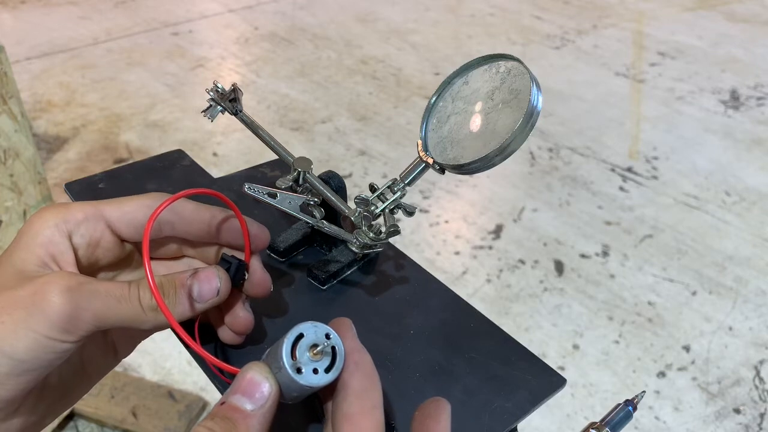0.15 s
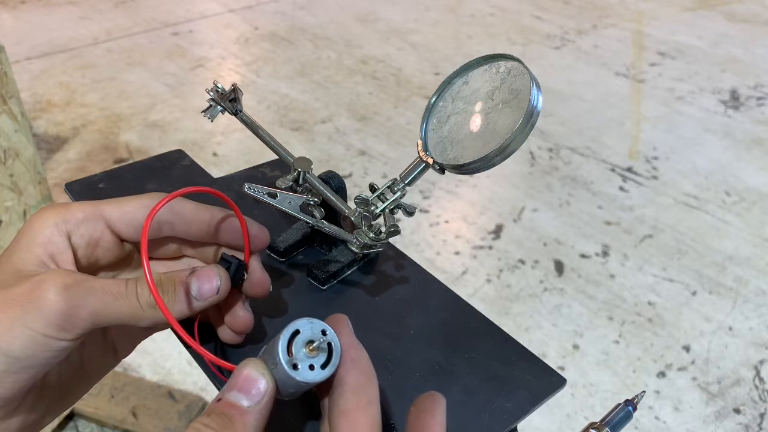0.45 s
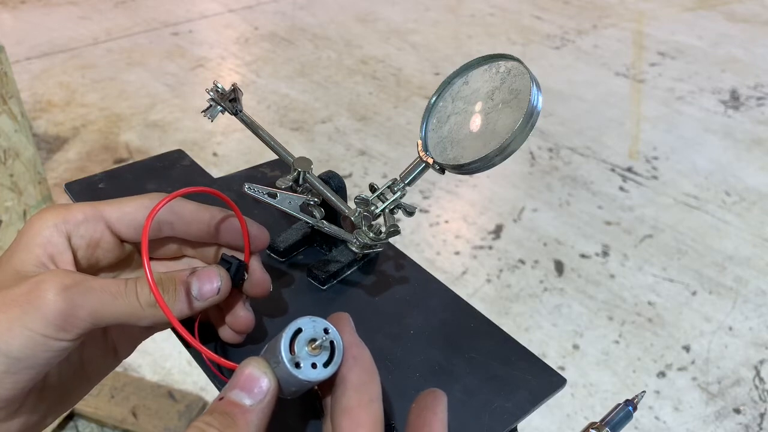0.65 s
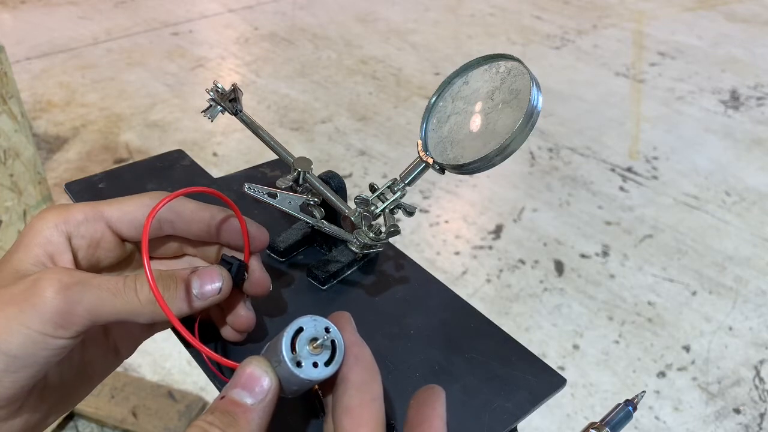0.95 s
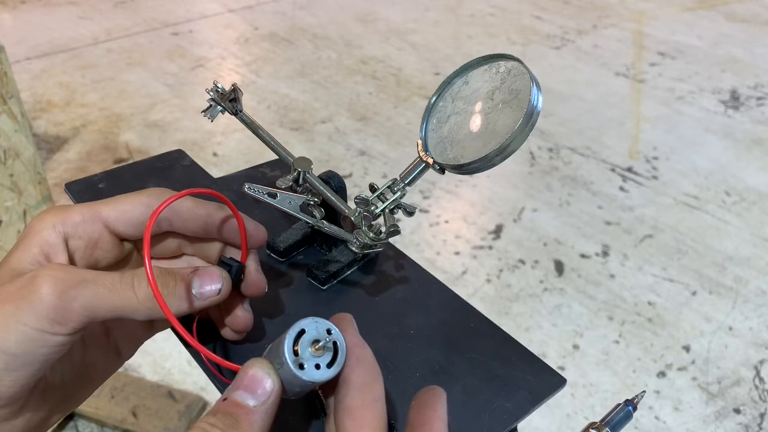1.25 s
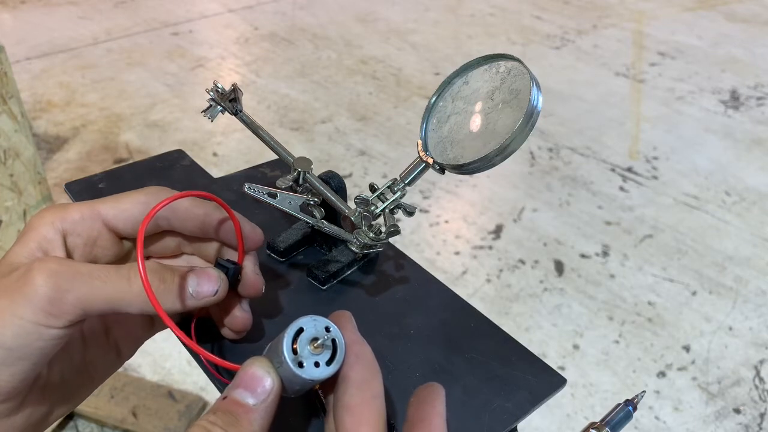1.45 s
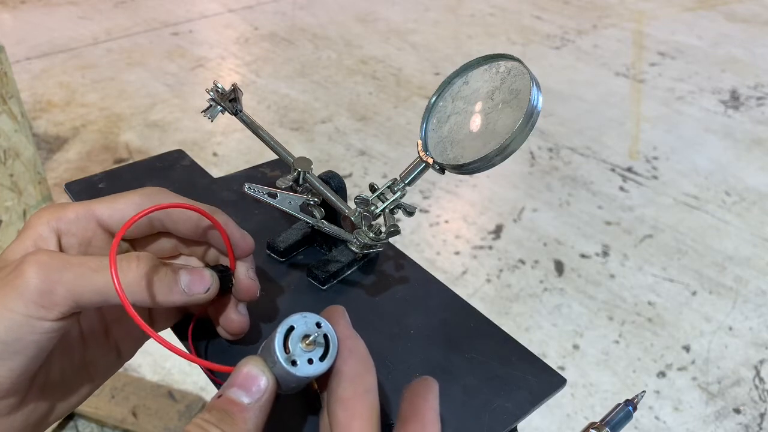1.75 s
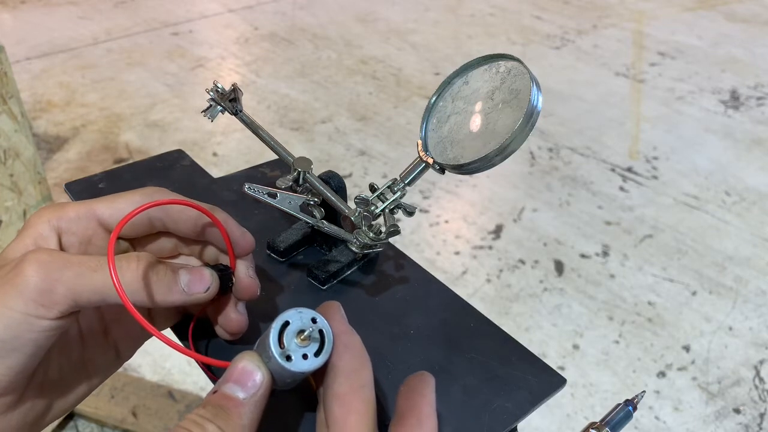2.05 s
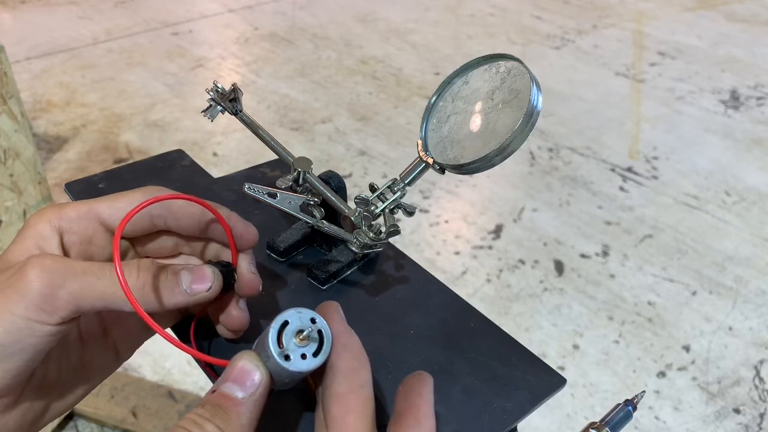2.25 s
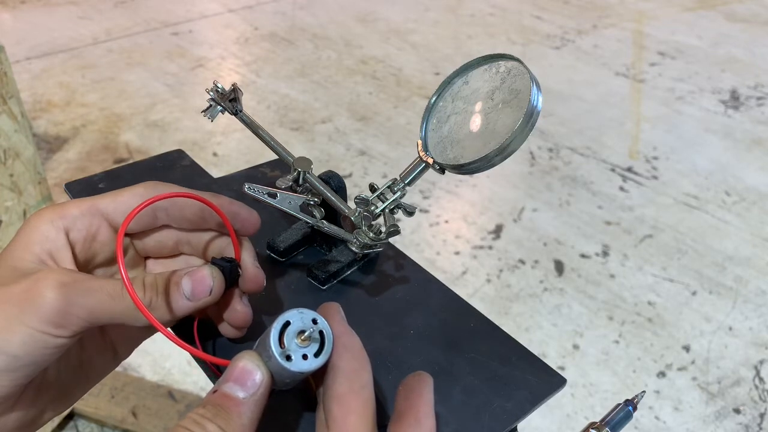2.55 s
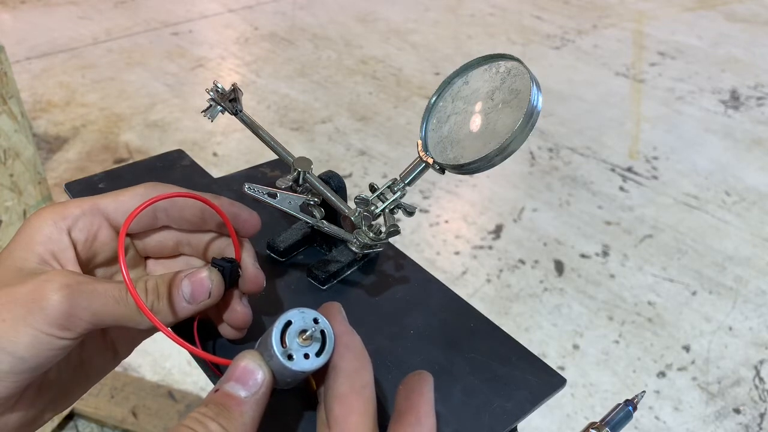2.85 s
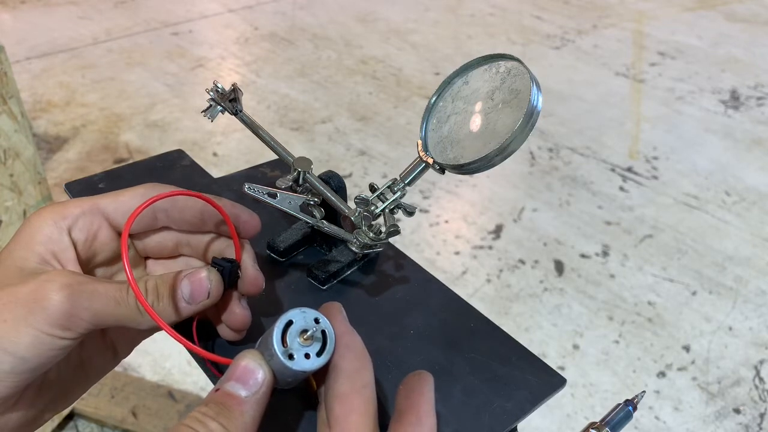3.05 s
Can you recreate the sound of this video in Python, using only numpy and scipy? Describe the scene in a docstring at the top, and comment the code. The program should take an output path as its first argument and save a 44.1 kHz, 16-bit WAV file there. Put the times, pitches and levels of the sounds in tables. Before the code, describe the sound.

A small electric motor whines down to a stop, a switch clicks, and it spins up again

```python
"""A quiet workshop: a small hand-held DC motor close to the microphones coasts to a stop, a switch clicks, it spins up.
A running phase in turns drives it all: rotor whine and rattle, frame shake, commutator song and knocks.
Brush noise ticks and scratches at the commutator gaps and slides between; the brushes chatter during spin-up
and the high partials sing out; at the end the motor starts to slow.
Behind it: filtered room noise, a swelling rumble and mains hum."""
import sys
import numpy as np
from scipy import signal
from scipy.fft import rfft, irfft, next_fast_len
from scipy.io import wavfile

SR = 44100
rng = np.random.default_rng(int(sys.argv[2]) if len(sys.argv) > 2 else 0)


def dump(signal):
    """Clip the signal to [-1, 1] and save it as 16-bit WAV at the path in sys.argv[1]."""
    limited = np.clip(np.atleast_2d(signal).T, -1, 1)
    pcm = np.round(limited * 32767).astype(np.int16)
    wavfile.write(sys.argv[1], SR, pcm)


N = 141120
T = np.arange(N) / SR
SIZE = next_fast_len(N + SR // 2)
HZ = np.maximum(np.arange(SIZE // 2 + 1) * SR / SIZE, 1)
CUTOFF_HZ = 15750
PATHS = 3  # direct, scattered to the left, scattered to the right
FULL_SLIDE_REV_PER_S = 217
WHINE_FLUTTER_DB, PARTIAL_FLUTTER_DB = 0.6, 2


def from_db(db):
    """Decibels to gain."""
    return 10 ** (np.asarray(db) / 20)


def rms_one(x):
    """Scale to unit power."""
    return x / np.sqrt(np.mean(np.abs(x) ** 2) + 1e-20)


def in_time(rows):
    """Control curve at every sample."""
    return np.interp(T, *np.transpose(rows))


def by_hz(rows):
    """Table over log frequency, at every bin."""
    hz, value = np.transpose(rows)
    return np.interp(np.log(HZ), np.log(hz), value)


def drift(rate_hz):
    """Slow random motion of spread 1: low-passed noise."""
    spectrum = rfft(rng.standard_normal(SIZE))
    return rms_one(irfft(spectrum / (1 + (HZ / rate_hz) ** 2), SIZE)[:N])


def colour(x, points, modes=()):
    """Minimum-phase filter of unit power gain with the given outline and narrow modes."""
    db = by_hz(points)
    for hz, width_hz, lift_db in modes:
        db = db + lift_db / (1 + (2 * (HZ - hz) / width_hz) ** 2)
    gain = rms_one(from_db(db) / np.sqrt(1 + (HZ / CUTOFF_HZ) ** 20))
    # fold the cepstrum to make the filter causal
    cepstrum = irfft(np.log(gain), SIZE)
    cepstrum[1:SIZE // 2] *= 2
    cepstrum[SIZE // 2 + 1:] = 0
    response = np.exp(rfft(cepstrum))
    return irfft(rfft(x, SIZE) * response, SIZE)[..., :N]


def fade(clicks, decay_s):
    """Each click starts an exponential decay."""
    return signal.lfilter([1], [1, -np.exp(-1 / (decay_s * SR))], clicks + 1e-18)


def partial(turns, order):
    """Sine at a multiple of the rotation, of unit power and random phase."""
    return np.sqrt(2) * np.sin(2 * np.pi * (order * turns + rng.random()))


# shaft speed: (time [s], speed [rev/s])
SHAFT_SPEED = [(0, 221), (.116, 194), (.234, 166), (.448, 123), (.6, 100), (.73, 80), (.8, 61), (.885, 36),
               (.94, 19), (.98, 0), (1.73, 0), (1.83, 100), (1.95, 178), (2.054, 218.7), (2.136, 246.5),
               (2.21, 265), (2.31, 283), (2.43, 295.8), (2.57, 306.1), (2.65, 314.4), (2.75, 322.7),
               (2.87, 330.4), (2.98, 335.6), (3.092, 339.2), (3.2, 310)]
# brush chatter: (time [s], share [0-1])
BRUSH_CHATTER = [(0, 0.1), (.5, 0), (1.8, 0), (2.0, 0.1), (2.25, 0.5), (2.555, 0.72), (2.58, 0.25),
                 (3.08, 0), (3.2, 0.6)]
# brush noise before BRUSH_GAIN_DB: (time [s], level [dB])
BRUSH_LEVEL = [(0, -35), (.06, -34.5), (.32, -39.5), (.634, -46), (.79, -57.5), (.87, -64), (1.0, -100),
               (1.72, -100), (1.745, -61.5), (1.83, -45), (1.9, -38.5), (2.13, -31), (2.35, -29),
               (2.553, -28.5), (2.575, -37.5), (2.74, -34.5), (3.08, -35.5), (3.2, -35.5)]
# frame rasp: (time [s], level [dB])
FRAME_LEVEL = [(0, -59), (.35, -60.5), (.65, -63.5), (.8, -66.5), (.98, -74.5), (1.73, -71), (1.83, -68.5),
               (1.95, -60.5), (2.13, -59), (2.55, -51), (2.58, -56.5), (3.2, -54.5)]
# outlines of the hiss, the hiss after its change of colour near the end, can, frame: (frequency [Hz], relative
# level [dB])
RUNNING_COLOUR = [(2500, -49.5), (4250, -15), (4600, -9.5), (5200, -16.5), (5900, -13), (7200, -7),
                  (8200, -12.5), (9000, -2.5), (10400, -1), (11100, -0.5), (12200, -48.5), (13700, -1),
                  (14600, -21), (15200, -3.5), (15600, -4)]
LATE_COLOUR = [(2500, -24), (4250, -21.5), (4600, -13.5), (5200, -9.5), (5900, -9), (7200, -6),
               (8200, -9.5), (9000, -9.5), (9700, -6.5), (10400, -0.5), (11100, 3), (12200, -32),
               (13700, -3), (15600, -1.5)]
CAN_COLOUR = [(1900, -21), (2450, -36), (3000, -6), (3500, 17.5), (3950, 1), (4250, -16), (5200, -48)]
FRAME_COLOUR = [(100, -36), (450, -10.5), (800, 3.5), (1100, 3), (1400, 3), (2100, 0.5), (3000, -47)]
# brush springs, a peak and a dip: (frequency [Hz], width [Hz], lift [dB])
SPRING_MODES = [(9660, 146, 5), (9700, 47, -4)]
START_TURNS = 0.22
JITTER_TURNS, CHATTER_JITTER_TURNS, JITTER_HZ = 0.0012, 0.0058, 27.8
BRUSH_GAIN_DB = 1.2
CAN_DB, CAN_REFERENCE_DB, CAN_DB_PER_BRUSH_DB = -44.5, -31.5, 0.49
LATE_COLOUR_S, COLOUR_CHANGE_S = 3.1, 0.012  # start, duration


def motor():
    """Brush force sounds through springs, can and frame; the hiss changes colour just after 3.1 s."""
    speed = in_time(SHAFT_SPEED)
    chatter = np.clip(in_time(BRUSH_CHATTER), 0, 1)
    level_db = in_time(BRUSH_LEVEL)
    running = np.minimum(speed / FULL_SLIDE_REV_PER_S, 1)

    jitter_turns = JITTER_TURNS + CHATTER_JITTER_TURNS * chatter
    turns = START_TURNS + np.cumsum(speed) / SR + running * jitter_turns * drift(JITTER_HZ)

    force = brush_contact(turns, speed, chatter)
    hiss = force * from_db(BRUSH_GAIN_DB + level_db)
    late = np.clip((T - LATE_COLOUR_S) / COLOUR_CHANGE_S, 0, 1)
    springs = colour(hiss * (1 - late), RUNNING_COLOUR, SPRING_MODES)
    springs = springs + colour(hiss * late, LATE_COLOUR)
    can_db = CAN_DB + CAN_DB_PER_BRUSH_DB * (level_db - CAN_REFERENCE_DB)
    can = colour(force * from_db(can_db), CAN_COLOUR)
    frame = colour(force * from_db(in_time(FRAME_LEVEL)), FRAME_COLOUR)

    body = springs + can + frame
    tones = commutator_song(turns) + running * rotor(turns, chatter) + shake(turns, speed)
    return body + tones + knocks(turns, speed)


# relative strength of the six gap ticks of one revolution: (level [dB])
GAP_LEVELS = [-0.5, -12, -4, -1.5, -7, -4]
GAP_SCATTER_TURNS, GAP_SCATTER_HZ, GAP_SPREAD_DB = 0.026, 1500, 0.52
SCRATCH_DECAY_S = 0.0007
TICK_DB, SCRATCH_DB, SLIDE_DB = -6.5, -4.5, -2.5
LUMP_DB, CHATTER_LUMP_DB, LUMP_HZ = -1, -0.5, 350


def brush_contact(turns, speed, chatter):
    """Force of about unit power: a mistimed tick and a scratch at each gap, lumpy sliding between."""
    running = np.minimum(speed / FULL_SLIDE_REV_PER_S, 1)
    gaps_per_turn = len(GAP_LEVELS)
    scatter = GAP_SCATTER_TURNS * running * drift(GAP_SCATTER_HZ)
    gap = np.floor(np.maximum.accumulate(turns + scatter) * gaps_per_turn).astype(int)
    gap_db = np.array(GAP_LEVELS)[gap % gaps_per_turn]
    strength = from_db(gap_db + GAP_SPREAD_DB * rng.standard_normal(N))
    # offset the tick rate, so power holds as speed changes
    rate_gain = np.sqrt(SR / (2 * np.maximum(speed, 20)))
    ticks = np.diff(gap, prepend=gap[0]) * strength * rate_gain

    envelope = np.sqrt(fade(ticks ** 2, SCRATCH_DECAY_S) / (SCRATCH_DECAY_S * SR))
    scratch = envelope * rng.standard_normal((PATHS, N))
    slide = running ** 0.5 * rng.standard_normal((PATHS, N))
    lump_db = LUMP_DB + CHATTER_LUMP_DB * chatter
    # second term holds the mean power
    lumps = from_db(lump_db * drift(LUMP_HZ) - lump_db ** 2 * np.log(10) / 20)
    noise = from_db(SCRATCH_DB) * scratch + from_db(SLIDE_DB) * slide
    return from_db(TICK_DB) * ticks + lumps * noise


# sung partials: {multiple of shaft speed: relative level [dB]}
SONG_ORDERS = {26: -8, 27: -1, 28: -7, 29: -1, 30: 0, 31: -6, 32: -5, 33: -5, 36: -5, 38: -9, 39: -5, 41:
               -8, 42: -6, 43: -6, 44: -8, 45: 2, 47: -8, 48: -5, 51: -8}
# song: (time [s], level [dB])
SONG_LEVEL = [(0, -67), (.2, -52), (.45, -61), (.9, -110), (1.75, -110), (1.95, -73), (2.15, -50.5),
              (2.55, -47.5), (2.75, -49.5), (3.1, -47), (3.2, -49)]
# brush-spring resonances under the song: (frequency [Hz], relative level [dB])
SONG_COLOUR = [(6500, -23.5), (8500, -8.5), (9000, -2.5), (9300, -11), (9650, 3.5), (10150, 4.5),
               (10800, -5), (11700, -26.5), (13200, -1.5), (13700, -8), (14200, -2), (14800, 0.5),
               (15150, -15.5)]


def commutator_song(turns):
    """Clean high partials of the rotation; each swells as it glides through a brush-spring resonance."""
    partials = 0
    for order, db in SONG_ORDERS.items():
        partials = partials + from_db(db + PARTIAL_FLUTTER_DB * drift(9.1)) * partial(turns, order)
    return colour(from_db(in_time(SONG_LEVEL)) * partials, SONG_COLOUR)


# whine at full running speed: (time [s], level [dB])
WHINE_LEVEL = [(0, -50), (.19, -59), (.25, -62), (.6, -80.5), (.95, -100), (1.86, -81), (1.965, -54),
               (2.054, -52), (2.136, -47), (2.33, -42), (2.5, -47.5), (2.57, -52), (2.7, -48), (3.2, -51)]
# rattle at full chatter and running speed: {multiple of shaft speed: level [dB]}
RATTLE_ORDERS = {3: -51, 6: -55, 7: -48.5}
POLES = 3
RATTLE_HZ, RATTLE_TOP_HZ = 75, 1950


def rotor(turns, chatter):
    """Pole-passing whine, plus partials roughened by random modulation as the rotor rattles."""
    whine_gain = from_db(in_time(WHINE_LEVEL) + WHINE_FLUTTER_DB * drift(15))
    whine = whine_gain * np.sqrt(2) * np.sin(2 * np.pi * POLES * turns)
    rattle = 0
    for order, db in RATTLE_ORDERS.items():
        angle = 2 * np.pi * order * turns
        rough = drift(RATTLE_HZ) * np.sin(angle) + drift(RATTLE_HZ) * np.cos(angle)
        rattle = rattle + from_db(db) * rough
    lowpass = signal.butter(6, RATTLE_TOP_HZ, fs=SR, output="sos")
    return whine + chatter * signal.sosfilt(lowpass, rattle)


# partials that shake the frame: {multiple of shaft speed: relative level [dB]}
SHAKE_ORDERS = {1: -2, 4: -6, 5: -5, 6: -2, 7: 6, 9: 2, 12: 0, 15: -2}
# frame resonance: (frequency [Hz], relative level [dB])
SHAKE_COLOUR = [(150, -12), (330, -4), (600, -10), (1000, -6), (1350, -2), (1750, -2), (2100, -12),
                (2600, -24)]
# levels at the reference speed, without torque
REFERENCE_REV_PER_S, SHAKE_DB, CAN_TONE_DB = 325, -79, -42
SHAKE_EXPONENT, CAN_TONE_EXPONENT, CAN_ORDER = 0.5, 11, 12
STANDSTILL_TORQUE_DB, TORQUE_FROM_S = 7, 1.9


def shake(turns, speed):
    """Low partials through the frame resonance, stronger under starting torque; a higher one rings the can."""
    pace = speed / REFERENCE_REV_PER_S
    torque = (T > TORQUE_FROM_S) * np.maximum(1 - pace, 0)
    fan = 0
    for order, db in SHAKE_ORDERS.items():
        fan = fan + from_db(db + PARTIAL_FLUTTER_DB * drift(12)) * partial(turns, order)
    fan_gain = from_db(SHAKE_DB + STANDSTILL_TORQUE_DB * torque) * pace ** SHAKE_EXPONENT
    tone_gain = from_db(CAN_TONE_DB + WHINE_FLUTTER_DB * drift(12)) * pace ** CAN_TONE_EXPONENT
    return colour(fan_gain * fan, SHAKE_COLOUR) + tone_gain * partial(turns, CAN_ORDER)


# knock: (frequency [Hz], relative level [dB])
KNOCK_COLOUR = [(600, -15.5), (1400, -2.5), (2100, -54), (3300, 6.5), (4300, -35.5), (5200, -5), (6000, 2),
                (7200, 5), (8500, -3.5), (9700, -2), (11500, -70), (15500, -20)]
KNOCKS_PER_TURN, KNOCKS_UNTIL_S, KNOCK_DECAY_S = 2, 1.9, 0.00087
# level at or above the full-strength speed
KNOCK_DB, KNOCK_SPREAD_DB, FULL_KNOCK_REV_PER_S = -38.5, 2, 79.5


def knocks(turns, speed):
    """Noise bursts twice a revolution, spreading out and weakening as the rotor slows to rest."""
    count = np.floor(np.maximum.accumulate(turns) * KNOCKS_PER_TURN)
    strength = np.minimum(speed / FULL_KNOCK_REV_PER_S, 1)
    strength = strength * from_db(KNOCK_DB + KNOCK_SPREAD_DB * rng.standard_normal(N))
    hits = np.diff(count, prepend=count[0]) * strength * (T < KNOCKS_UNTIL_S)
    bursts = fade(hits, KNOCK_DECAY_S) * rng.standard_normal((PATHS, N))
    return colour(bursts, KNOCK_COLOUR)


# snap and bounce: (time [s], level [dB])
SWITCH_CONTACTS = [(1.727, -20.5), (1.728, -31)]
# plastic case: (frequency [Hz], relative level [dB])
SWITCH_COLOUR = [(800, -27), (3000, -35), (3600, -11), (4350, -1), (5300, -26), (7000, -11), (9600, -7.5),
                 (10600, 0), (12700, -3), (15500, -14)]
SWITCH_DECAY_S = 0.00052


def switch():
    """Very short contacts in a plastic case: decaying noise bursts."""
    time_s, db = np.transpose(SWITCH_CONTACTS)
    clicks = np.zeros(N)
    clicks[(time_s * SR).astype(int)] = from_db(db)
    return colour(fade(clicks, SWITCH_DECAY_S) * rng.standard_normal(N), SWITCH_COLOUR)


# room noise: (frequency [Hz], relative level [dB])
ROOM_COLOUR = [(20, -24.5), (55, 0.5), (130, -2.5), (180, -2.5), (250, -1), (400, -7), (800, -15.5),
               (1500, -24.5), (3000, -24), (8000, -27.5), (15000, -34)]
# rumble: (time [s], level [dB])
RUMBLE_LEVEL = [(0, -79), (.85, -78.5), (1.1, -67.5), (1.35, -70), (1.5, -73), (3.2, -82.5)]
# rumble: (frequency [Hz], relative level [dB])
RUMBLE_COLOUR = [(30, -25), (70, -2), (125, 0.5), (220, -12.5), (400, -19.5), (1200, -63)]
# hum: {multiple of mains frequency: level [dB]}
HUM_ORDERS = {2: -75, 4: -77, 8: -87, 10: -74.5, 14: -83, 16: -78, 20: -86, 22: -89, 24: -90, 26: -85, 28:
              -86, 30: -89, 38: -91, 40: -90}
MAINS_HZ, HUM_WAVER_DB, RUMBLE_WAVER_DB = 59.95, 1.2, 3
ROOM_DB, SIDE_HIGHPASS_HZ = -68, 512


def workshop():
    """Low room noise, alike on both sides in the bass, an uneven rumble and wavering mains hum."""
    mid, side = colour(rng.standard_normal((2, N)), ROOM_COLOUR)
    highpass = signal.butter(1, SIDE_HIGHPASS_HZ, "high", fs=SR, output="sos")
    side = signal.sosfilt(highpass, side)
    room = from_db(ROOM_DB) * np.array([mid + side, mid - side])

    hum = 0
    for order, db in HUM_ORDERS.items():
        # sides differ more in phase at higher orders
        phase_turns = rng.random() + order / 200 * rng.normal(size=(2, 1))
        tone = np.sqrt(2) * np.sin(2 * np.pi * (order * MAINS_HZ * T + phase_turns))
        hum = hum + from_db(db + HUM_WAVER_DB * drift(7.7)) * tone

    rumble_gain = from_db(in_time(RUMBLE_LEVEL) + RUMBLE_WAVER_DB * drift(10))
    rumble = rumble_gain * colour(rng.standard_normal(N), RUMBLE_COLOUR)
    return room + rumble + hum


# phase between the ports: (frequency [Hz], left lead [rad])
MIC_PHASE = [(100, 1), (1000, 1.92), (1500, 1.4), (2400, 17), (2950, 7.5), (3450, 4), (4100, 3.5),
             (4900, 5), (6000, 6), (7000, 3.5), (8000, 1.28), (9300, 0.5), (11600, -4), (14000, -5.5),
             (16000, -4)]
# scattered sound: (frequency [Hz], power share [0-1])
SCATTERED_SHARE = [(300, 0.74), (900, 0.08), (1500, 0.51), (2100, 0.39), (2450, 0.076), (2850, 0.023),
                   (3400, 0.54), (4050, 0.027), (5200, 0.29), (7200, 0.25), (9500, 0.072), (11700, 0.0067),
                   (12900, 0.049), (15000, .13)]
# balance: (frequency [Hz], left minus right [dB])
MIC_BALANCE = [(300, 1), (700, 1.5), (880, 4.5), (1000, 0.5), (2000, 4), (4000, -0.5), (5500, -2.5),
               (8000, 0)]
SCATTER_DECAY_S = 0.0062


def microphones(paths):
    """Direct sound at two spaced ports, plus sound scattered by hands and bench (decaying noise echoes)."""
    share = np.clip(by_hz(SCATTERED_SHARE), 0, 1)
    tail_s = T[:SR // 10]
    tails = rng.standard_normal((2, len(tail_s))) * np.exp(-tail_s / SCATTER_DECAY_S)
    echoes = rms_one(rfft(tails, SIZE))
    sides = np.array([[0.5], [-0.5]])  # left, right
    spectra = rfft(paths, SIZE)
    direct = spectra[0] * np.exp(1j * sides * by_hz(MIC_PHASE))
    scattered = echoes * spectra[1:]
    both = np.sqrt(1 - share) * direct + np.sqrt(share) * scattered
    return irfft(both * from_db(sides * by_hz(MIC_BALANCE)), SIZE)[:, :N]


def scene():
    """Motor and switch in the workshop."""
    return microphones(motor() + switch()) + workshop()


def record(dry):
    """Steep elliptic low-pass cuts the top."""
    return signal.sosfilt(signal.ellip(12, 0.2, 70, CUTOFF_HZ, fs=SR, output="sos"), dry)


dry = scene()
out = record(dry)
dump(out)
```